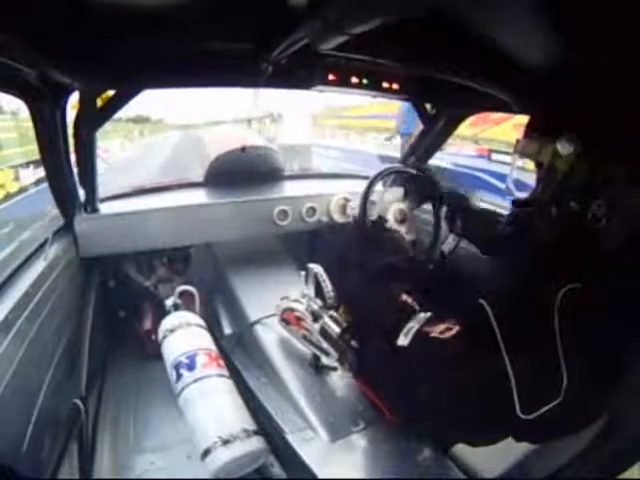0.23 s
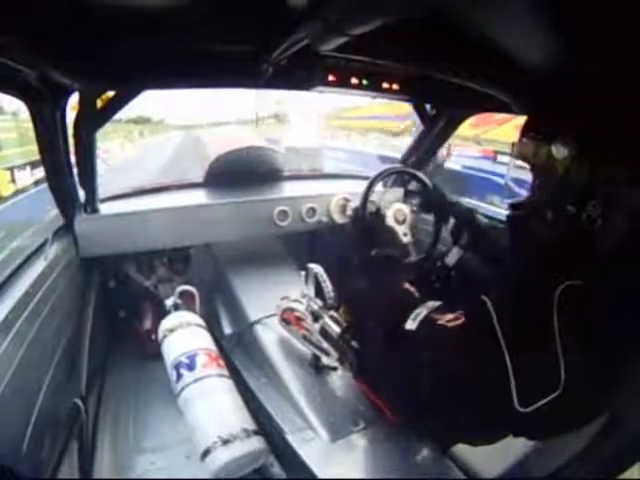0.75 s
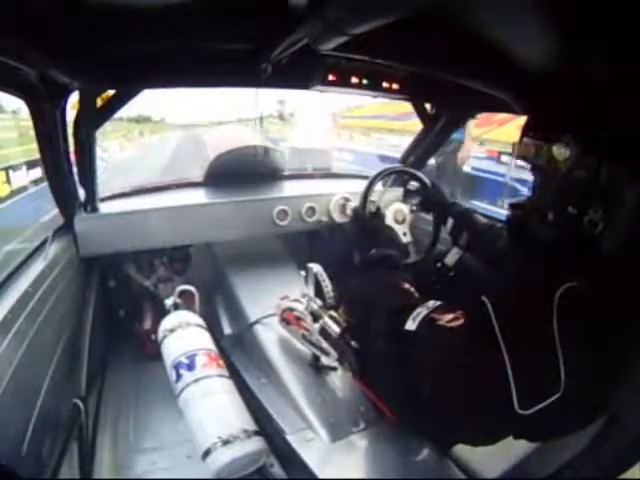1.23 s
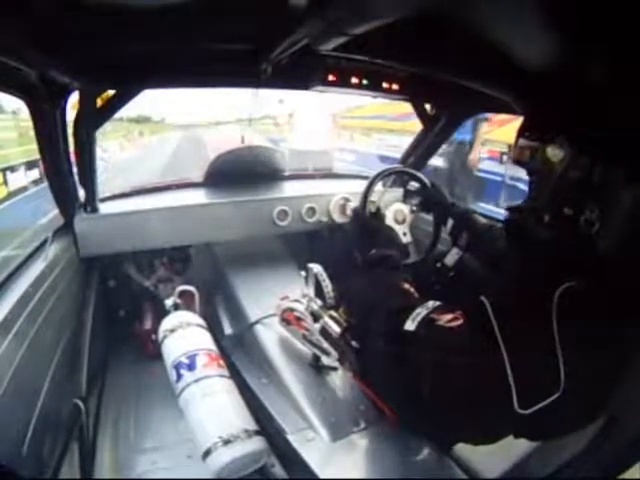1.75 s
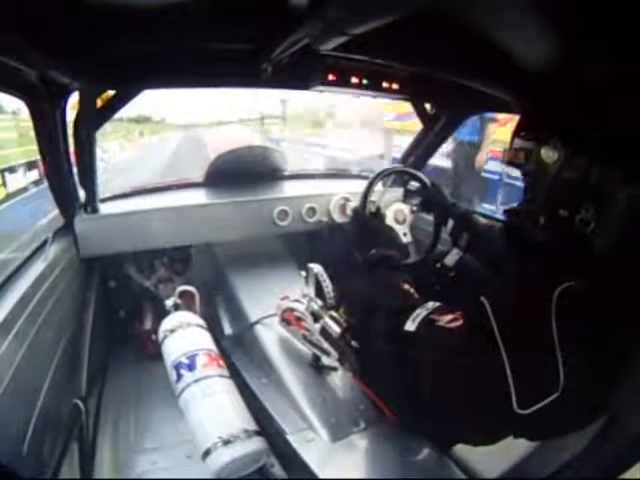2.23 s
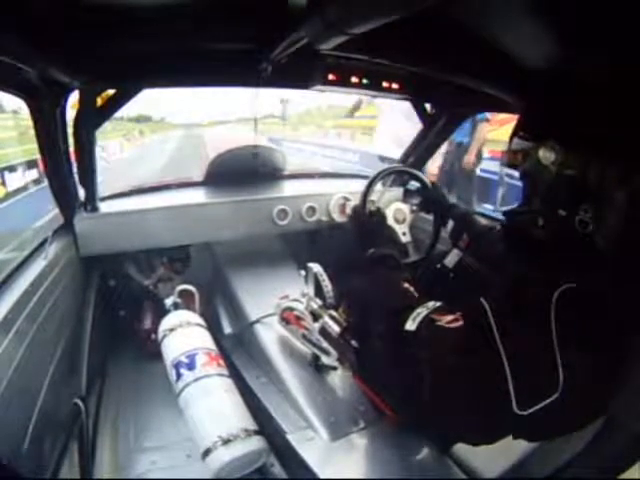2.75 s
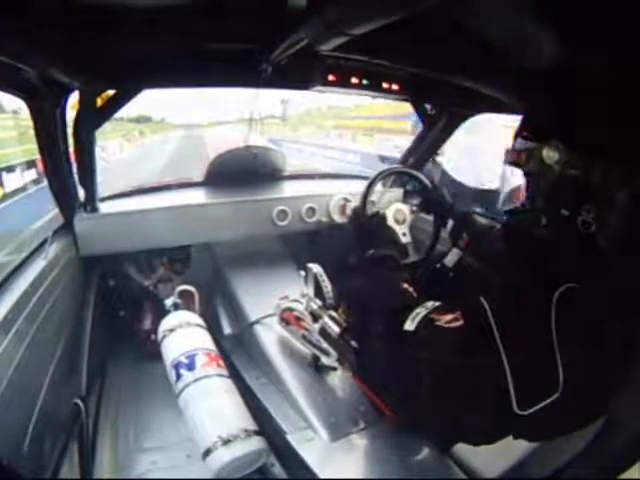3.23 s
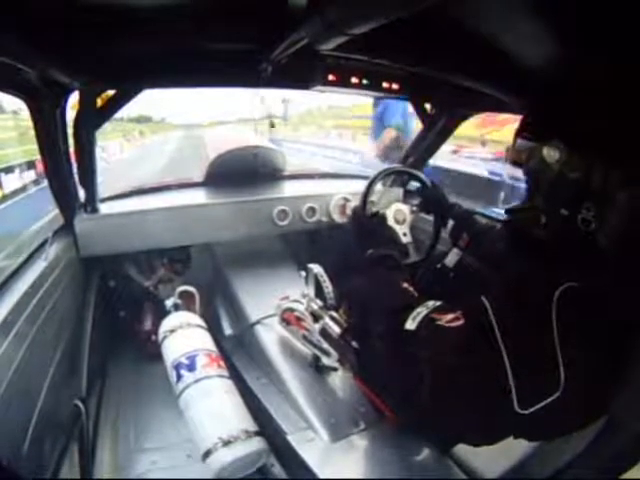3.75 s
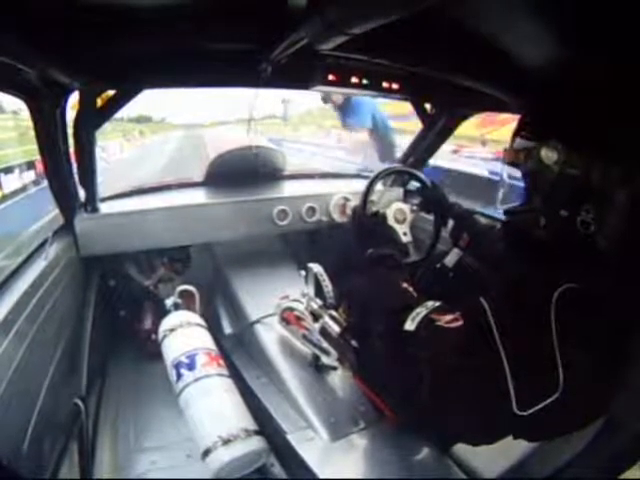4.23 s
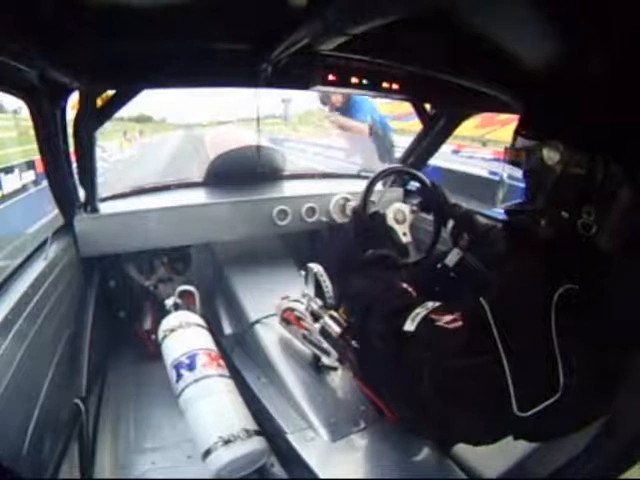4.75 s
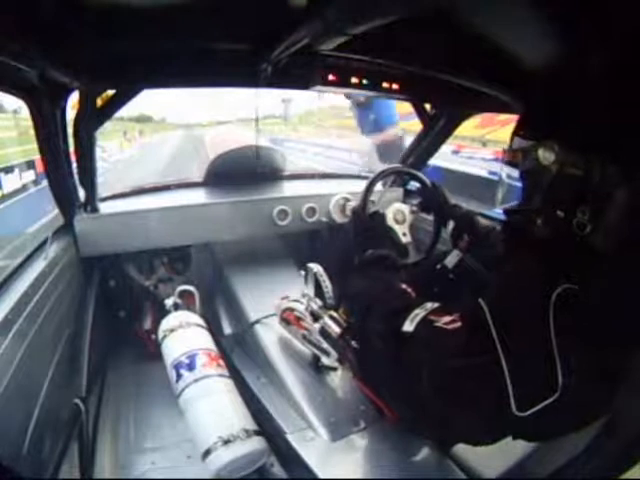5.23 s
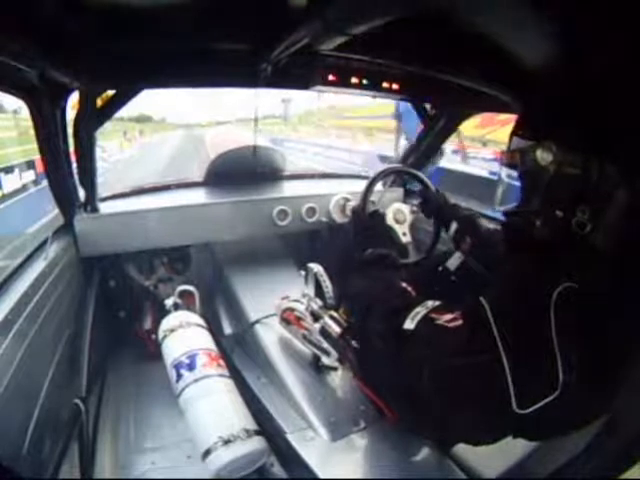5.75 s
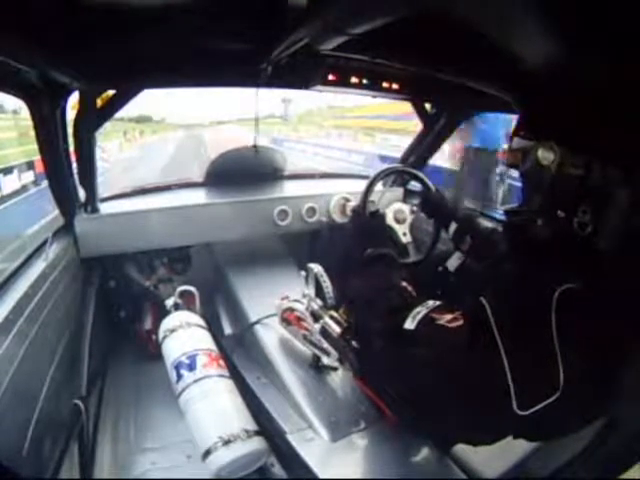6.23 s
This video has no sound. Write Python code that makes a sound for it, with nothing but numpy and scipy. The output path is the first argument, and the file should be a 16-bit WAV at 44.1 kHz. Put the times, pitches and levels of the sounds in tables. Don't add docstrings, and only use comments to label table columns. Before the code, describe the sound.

Inside a stripped metal race-car cabin, a powerful V8 idles roughly. A deep, nearly pure low boom stumbles and flutters as burns misfire, climbing quickly in pitch and sagging about once a second. Panels drone beneath it, while quieter hiss and valve ticks come through the firewall. A calmer stretch comes late, then two quick surges. The onboard microphone is coarse, dull and grainy.

```python
import sys
import numpy as np
from scipy import signal
from scipy.fft import rfft, irfft, next_fast_len
from scipy.io import wavfile
from scipy.ndimage import uniform_filter1d, map_coordinates

SR = 44100
rng = np.random.default_rng(int(sys.argv[2]) if len(sys.argv) > 2 else 0)


def file_out(sig):
    cols = np.atleast_2d(sig).T
    lim = np.clip(cols, -1, 1)
    pcm = np.round(lim * 32767).astype(np.int16)
    wavfile.write(sys.argv[1], SR, pcm)


def gain_from_db(level_db):
    decades = np.asarray(level_db, float) / 20
    return 10 ** decades


N = 286209

# [t/s, effort level/dB, boom level/dB]
WORKLOAD = [(0, -51, -16.5), (.18, -51, -16), (.4, -42.5, -14.5), (.75, -47.5, -14.5), (1.17, -44.5, -11.5),
            (1.52, -49.5, -12), (2.02, -43.5, -15), (2.5, -50.5, -13.5), (2.88, -44, -15.5),
            (3.4, -49, -14.5), (3.62, -41.5, -13), (3.9, -49, -12.5), (4.5, -46, -15.5), (4.75, -50.5, -16),
            (5.65, -52.5, -17), (5.93, -44, -13.5), (6.27, -51, -17), (6.49, -41.5, -4)]
# [t/s, clatter level/dB, boom level/dB]
RICH_BURNS = [(.005, 1.5, -6), (.28, 2.5, 3), (.345, 0, 5), (0.621, 3, -16.5), (.824, 2, 0), (1.14, 1, 1),
              (1.38, 1.5, 3.5), (1.704, 2.5, 8), (2.05, 0.5, 1), (2.227, 1, 0.5), (2.309, 1, 2.5),
              (2.645, 1, 4), (2.86, 0.5, 1.5), (3.16, -2.5, 0.5), (3.42, 5, 4), (3.634, -0.5, 5),
              (3.83, -0.5, -0.5), (4.225, 0.5, 2), (4.365, 1.5, 2), (4.575, 0, 5.5), (4.72, 0.5, 1),
              (5.04, 5.5, -1.5), (5.24, 2, 0.5), (5.41, 4, -1), (5.485, 3.5, -8), (5.73, 4.5, 4.5),
              (5.98, 0.5, 3.5), (6.225, 5.5, -13.5), (6.41, 3, -1.5), (6.49, -1, -5)]


def unit(x):
    return x / np.sqrt(np.mean(x ** 2) + 1e-20)


def curves(rows):
    times, *columns = np.transpose(rows)
    return [np.interp(np.arange(N) / SR, times, column) for column in columns]


def wobble(rate):
    knots = rng.standard_normal(int(N * rate / SR) + 4)
    return map_coordinates(knots, [np.arange(N) * rate / SR])


def slowly(shape):
    step_s = 1 / 2000
    t = np.arange(0, N / SR + step_s, step_s)
    return np.interp(np.arange(N) / SR, t, shape(t))


def bumps(times, widths_s, heights):
    return slowly(lambda t: np.exp(-0.7 * ((t[:, None] - times) / widths_s) ** 2) @ heights)


def filtered(x, response):
    size = next_fast_len(N + SR // 2)
    return irfft(rfft(x, size) * response(np.fft.rfftfreq(size, 1 / SR)), size)[:N]


def modes(table):
    def response(f):
        total = 0
        for k, (center, width, db) in enumerate(table):
            damping = 1j * f * width
            total = total + (-1) ** k * gain_from_db(db) * damping / (center * center - f * f + damping)
        return total
    return response


def even(x, seconds):
    power = np.abs(uniform_filter1d(x ** 2, int(seconds * SR)))
    return x / np.sqrt(power + 0.0067 * np.mean(x ** 2))


def speed():
    # [t/s, firing rate f/Hz]
    resting = [(0, 82.54), (.25, 78.5), (.95, 82.5), (1.55, 80.74), (1.9, 85.14), (2.5, 80.92), (3.4, 84.9),
               (4.1, 81.23), (4.75, 82.5), (5.1, 79.7), (5.4, 73.3), (5.75, 76.2), (6.3, 89)]
    # [middle of climb t/s, middle of fall t/s, top rate f/Hz, fall time/s]
    surges = [
        (0.332, 0.716, 97.9, 0.15),
        (1.06, 1.454, 96.46, 0.031),
        (1.969, 2.427, 97.67, 0.076),
        (2.708, 3.202, 96.86, 0.076),
        (3.56, 3.869, 94.7, 0.051),
        (4.479, 4.665, 95.14, 0.03),
        (5.84, 6.22, 96.1, 0.065),
        (6.412, 6.798, 94.9, .05),
    ]
    climb_s = 0.046
    rate, t = curves(resting)[0], np.arange(N) / SR
    for up, down, top_hz, fall_s in surges:
        climbed = 1 + np.tanh((t - up) / climb_s)
        not_fallen = 1 - np.tanh((t - down) / fall_s)
        rate = rate + (top_hz - rate) * climbed * not_fallen / 4
    return rate


def effort():
    # [t/s, half length/s, effort level/dB]
    lulls = [(.1, 0.025, -2), (0.735, 0.069, -4), (0.942, 0.045, -5.5), (1.44, 0.035, -3),
             (1.85, 0.064, -4.5), (2.41, 0.018, -1), (3.21, .04, -1.5), (3.47, 0.05, -4.5),
             (3.792, 0.024, -3.5), (3.862, 0.012, -6), (4.27, 0.029, -5), (4.653, 0.03, -5),
             (4.98, .03, -2), (5.686, 0.038, -5.5), (6.06, 0.029, -0.5), (6.29, .03, 1)]
    return curves(WORKLOAD)[0] + bumps(*np.transpose(lulls))


def working(level_db, per_effort, db_per_hz):
    return level_db + per_effort * (effort() + 47.5) + db_per_hz * (speed() - 87)


def burning():
    # [t/s, half width/ms, share left (minus = slowing)]
    misfires = [(.495, 25, 0.36), (.543, 38, -0.086), (.76, 15, 0.24), (1.075, 32, 0.22),
                (1.221, 27, 0.088), (1.27, 47, 0.43), (1.42, 53, 0.2), (1.506, 16, -0.089),
                (1.741, 66, 0.11), (2.12, 26, .21), (2.421, 21.5, 0.013), (2.687, 21, 0.091),
                (2.968, 48, 0.072), (3.102, 31, -0.15), (3.675, 22, -0.099), (3.742, 49, 0.026),
                (3.871, 23, -0.061), (4.517, 28, 0.44), (4.631, 16, -0.08), (4.77, 19, 0.12),
                (4.852, 34, -0.056), (4.935, 16, 0.12), (4.986, 19, 0.087), (5.144, 29, -0.18),
                (5.303, 40, 0.28), (5.664, 26, -0.24), (5.923, 17, 0.31), (6.255, 20, 0.14),
                (6.353, 21, -.47), (6.446, 38, 0.22)]
    # [t/s, share left]
    skips = [(.044, -0.46), (0.129, -0.42), (0.468, -0.072), (0.69, -0.03), (.852, -0.27), (0.92, -0.26),
             (1.997, 0.11), (2.228, .19), (2.261, .27), (2.486, -0.25), (3.217, -.05), (3.376, -.07),
             (3.492, -0.31), (3.58, 0.029), (3.782, -0.014), (4.246, -0.4), (4.688, 0.23), (4.733, -0.0071),
             (5.386, -.16), (5.465, 0.2), (5.617, -.13), (5.706, -.31), (6.041, .1), (6.068, 0.54),
             (6.172, .45), (6.196, -.11)]
    # [t/s, depth level/dB]
    sags = [(.2, -4.5), (.363, -8), (.61, 10), (.975, -9), (1.291, -18), (1.558, -2.5), (1.838, -8),
            (1.904, -8), (2.166, -5), (2.37, -9.5), (2.543, -8.5), (2.809, -9.5), (2.896, -5), (2.997, -11),
            (3.068, -12), (3.306, -8.5), (3.441, -12), (3.935, -2.5), (3.992, -4), (4.04, -5), (4.135, -5),
            (4.29, -8.5), (4.315, -3), (4.4, 0), (4.476, -7.5), (4.905, -20), (5.52, -7), (5.58, -14),
            (5.742, -8), (6.011, -7.5)]
    skip_ms, sag_s, swell_s = 14, 0.0097, 0.025
    s, width_ms, left = np.transpose(misfires + [(at, skip_ms, share) for at, share in skips])
    lean_s, depth_db = np.transpose(sags)
    rich_s, _, rich_db = np.transpose(RICH_BURNS)

    def flips(t):
        slide = np.tanh((t[:, None] - s) * 1000 / width_ms)
        return np.prod(slide - 1j * left * np.sqrt(1 - slide ** 2), axis=1)

    return slowly(flips) * gain_from_db(bumps(lean_s, sag_s, depth_db) + bumps(rich_s, swell_s, rich_db))


def firings(turns, scatter_db):
    cylinders = [-6.5, -2.5, 4.8, 8.5, 3, -3.5, 0.5, 4]
    at = np.flatnonzero(np.diff(np.floor(turns)) > 0)
    scatter = scatter_db * rng.standard_normal(len(at))
    return np.bincount(at, gain_from_db(np.resize(cylinders, len(at)) + scatter), N)


def firing_tone(turns):
    shudder = 0.15 * wobble(25) + 0.1 * wobble(70)
    strength = gain_from_db(0.5 * wobble(30))
    spin = burning() * np.exp(1j * (2 * np.pi * turns + shudder))
    tone = np.sqrt(2) * np.real(spin) * strength
    octave = gain_from_db(-30 + 4 * wobble(18)) * np.cos(4 * np.pi * turns + 2.2 * wobble(25))
    return tone + octave


def cabin_ring(burns):
    # [f/Hz, width/Hz, level/dB]
    cabin = [(78, 5.9, -11), (99.1, 13.4, 21.5)]
    air = modes(cabin)
    return even(filtered(burns, lambda f: air(f) ** 2), seconds=0.1)


def cabin_throb(burns):
    # [f/Hz, width/Hz, level/dB]
    lengthwise = [(52, 7.5, 0)]
    # [t/s, half length/s, swell level/dB]
    throbs = [(0.302, .12, 9), (0.567, 0.086, 14), (1.002, 0.032, 2), (1.28, .08, 8), (1.85, .06, -4),
              (2.3, .04, 10), (3.1, .25, 7.5), (3.55, .06, -2), (3.853, 0.11, 11), (4.167, 0.057, 6),
              (4.896, 0.056, 9.5), (5.55, 0.31, 3.5), (6.051, 0.068, 6), (6.379, 0.072, 10.5)]
    along = modes(lengthwise)
    throb = even(filtered(burns, lambda f: along(f) ** 2), seconds=0.1)
    return gain_from_db(-34 + bumps(*np.transpose(throbs)) + 0.5 * wobble(14)) * throb


def boom(turns):
    burns = firings(turns, scatter_db=5)
    boom_level = gain_from_db(curves(WORKLOAD)[1])
    return boom_level * (firing_tone(turns) + gain_from_db(-19) * cabin_ring(burns)) + cabin_throb(burns)


def drone(turns):
    # [f/Hz, width/Hz, level/dB]
    panels = [(32, 15.3, 2), (114, 30.2, 7.5), (163, 46.2, 3), (189.4, 44.7, 0), (283.3, 19.4, -2),
              (339, 54, -12.5), (460, 25, -13), (491, 27.7, -13)]
    # [t/s, half length/s, swell level/dB]
    shudders = [
        (0.038, 0.047, 2),
        (0.644, 0.072, 2.5),
        (.9, 0.038, 3.5),
        (1.3, .1, 0.5),
        (1.68, 0.11, 2),
        (3.036, 0.025, 3),
        (3.156, 0.019, 4.5),
        (4.1, 0.049, 1.5),
        (5.195, .15, 2),
        (6.153, 0.064, 4.5),
    ]
    drone_db = working(-38.5, per_effort=0.53, db_per_hz=0.203) + 3
    shake = unit(firings(turns, scatter_db=10)) * 0.24 + rng.standard_normal(N)
    sheet = modes(panels)

    def response(f):
        return sheet(f) * (1 - 0.39 * np.exp(-((f - 85) / 30) ** 2))

    return gain_from_db(drone_db + bumps(*np.transpose(shudders))) * even(filtered(shake, response), seconds=0.15)


def flaring():
    s, flare_db, _ = np.transpose(RICH_BURNS)
    burn_db = 20 * np.log10(np.abs(burning()) + 0.05)
    return bumps(s, 0.015, flare_db) + 0.085 * burn_db


def patchy(x, depth_db):
    z = signal.stft(x, nperseg=512)[2]
    field = uniform_filter1d(rng.standard_normal(z.shape), 4, 0)
    field = uniform_filter1d(field, 9, 1)
    return signal.istft(z * gain_from_db(depth_db * unit(field)), nperseg=512)[1][:N]


def clatter(turns):
    # [f/Hz, width/Hz, level/dB]
    metal = [(741, 19, 1.5), (867, 5.6, 9.5), (1019, 6.1, 4.5), (1094, 46, -7.5), (1563, 88, 0.5),
             (1931, 42, 3), (2523, 88, -1), (2767, 59, -5.5), (3266, 280, -3.5)]
    # [f/Hz, level/dB]
    firewall = [(210, -36), (350, -2.5), (672, -14.5), (759, -6), (940, -9.5), (2260, -8.5), (2550, -5.5),
                (3990, -13), (5190, -65), (8780, -120)]
    flare_db = flaring()
    rattle_db = effort() + flare_db + 1
    roar_db = working(-51, per_effort=1, db_per_hz=0.1139) + 1.2 * flare_db
    gate = gain_from_db(0.38 * np.cos(2 * np.pi * turns) + 0.31 * wobble(14) + 1.24 * wobble(120))
    struck = rng.random(N) < 400 / SR
    ticks = struck * rng.standard_normal(N) * gain_from_db(3 * rng.standard_normal(N))
    hiss = patchy(gate * rng.standard_normal(N) + gain_from_db(-13) * unit(ticks), depth_db=1.8)
    hz, db = np.transpose(firewall)
    ringing = modes(metal)

    def broad(f):
        return gain_from_db(np.interp(np.log(f + 1), np.log(hz), db)) * (0.92 + 1.17 * np.abs(ringing(f)))

    def high(f):
        return 1 / (1 + (1250 / (f + 1)) ** 8)

    roar = unit(filtered(hiss, lambda f: broad(f) * (1 - high(f))))
    rattle = unit(filtered(hiss, lambda f: broad(f) * high(f)))
    return gain_from_db(roar_db) * roar + gain_from_db(rattle_db) * rattle


def knocking():
    # [t/s, peak level/dB]
    knocks = [
        (0.2935, -29),
        (1.5973, -36),
        (2.2124, -34),
        (5.0245, -37),
    ]
    s, peak_db = np.transpose(knocks)
    blows = np.bincount((s * SR).astype(int), gain_from_db(peak_db), N)
    return gain_from_db(24) * filtered(blows, modes([(2100, 1200, 0), (3300, 1400, 0)]))


def scene():
    turns = np.cumsum(speed()) / SR
    return (boom(turns) + drone(turns) + clatter(turns) + knocking())[None]


def roll_off(x):
    return signal.sosfilt(signal.butter(12, 12950, fs=SR, output="sos"), x)


def record(dry):
    sample_hz, block_s, first_s, slip_s = 8000, 0.256, 0.141, 2.07e-5
    t = np.arange(N) / SR
    late = slip_s * np.floor((t - first_s) / block_s)
    held = np.floor((t - late) * sample_hz) / sample_hz + late
    steps = np.interp(held, t, dry[0])
    return roll_off(steps[None])


dry = scene()
out = record(dry)
file_out(out)
```